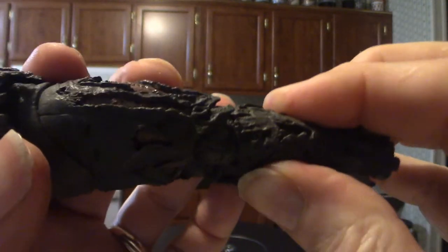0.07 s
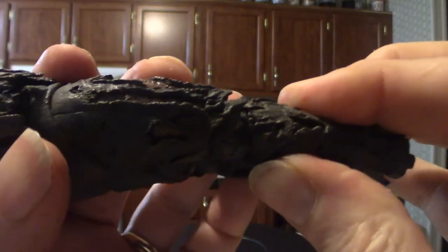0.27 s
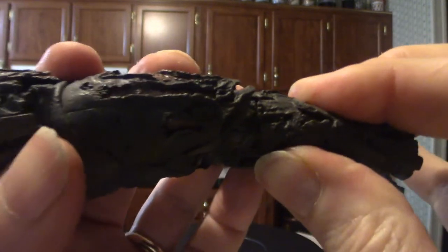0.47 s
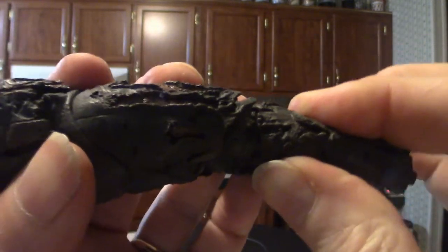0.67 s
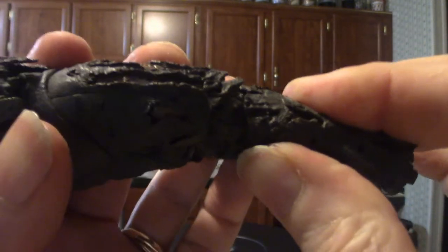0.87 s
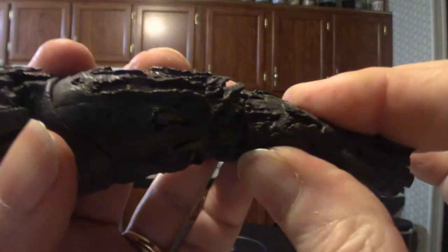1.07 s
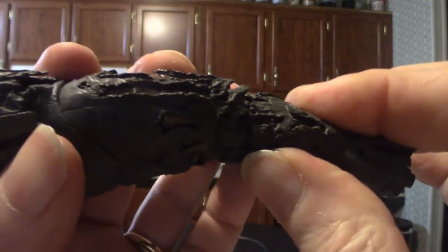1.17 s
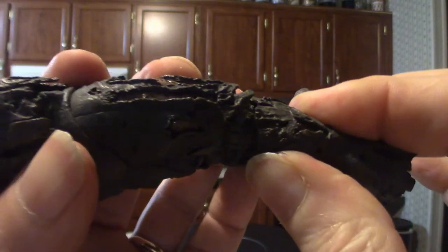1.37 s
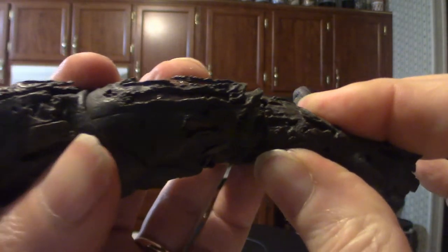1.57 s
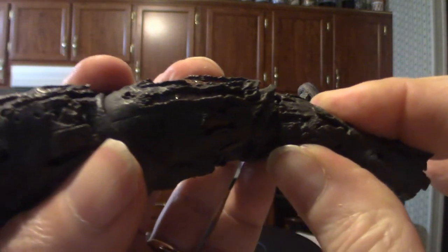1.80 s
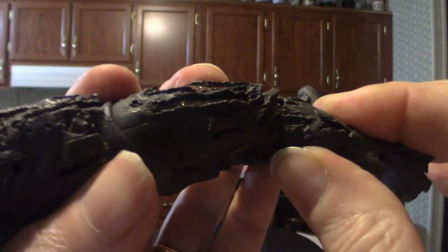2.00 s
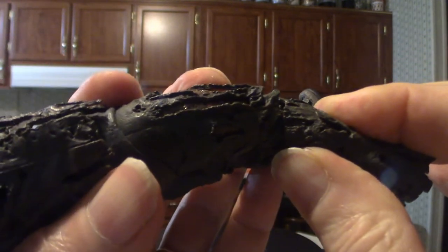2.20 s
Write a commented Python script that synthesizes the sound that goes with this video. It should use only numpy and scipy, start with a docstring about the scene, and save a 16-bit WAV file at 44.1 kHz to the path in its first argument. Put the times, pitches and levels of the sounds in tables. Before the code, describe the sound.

Sharp plastic ratchet clicks from a toy figure's joint, single at first, then a fast run.

```python
"""Toy figure's ratchet joint

In a kitchen, close to a stereo microphone, hands bend the stiff joint of a plastic toy figure.
It first scrapes in small slips, then snaps from tooth to tooth, singly and in a fast run.
Every snap rings the same short-lived plastic modes. The limb knocks dully three times,
the gripping fingers rumble, and the room answers over its own quiet tone."""
import sys
import numpy as np
from scipy import signal
from scipy.fft import rfft, irfft, next_fast_len
from scipy.io import wavfile
from scipy.ndimage import uniform_filter1d

SR = 44100
rng = np.random.default_rng(int(sys.argv[2]) if len(sys.argv) > 2 else 0)


def wrap_up_sound(samples):
    """Save the sound to the file named by the first command line argument, as 16-bit audio."""
    columns = np.atleast_2d(samples).T
    # keep every value between -1 and 1, then stretch to whole-number steps
    tamed = np.clip(columns, -1, 1)
    steps = np.round(tamed * 32767).astype(np.int16)
    wavfile.write(sys.argv[1], SR, steps)


N = 99048
TOP_HZ = 16600  # the microphone's band limit


def amp(db):
    """Decibels as a gain."""
    return 10 ** (np.asarray(db) / 20)


def unit(x):
    """x scaled to an RMS of one."""
    return x / np.sqrt(np.mean(x ** 2) + 1e-20)


def along(points, hz):
    """A curve through (Hz, value) points on a log frequency axis."""
    freqs, values = np.transpose(points)
    return np.interp(np.log(hz + 1), np.log(freqs + 1), values)


def swell(points):
    """Gain per sample from (seconds, dB) points, silent outside them."""
    s, db = np.transpose(points)
    return amp(np.interp(np.arange(N) / SR, s, db, left=-120, right=-120))


def filtered(x, response):
    """x through a filter given as a function of frequency."""
    n = x.shape[-1]
    size = next_fast_len(n + SR // 4)
    return irfft(rfft(x, size) * response(np.fft.rfftfreq(size, 1 / SR)), size)[..., :n]


def diffuse(colour, n):
    """Coloured noise that reaches the stereo microphone from all sides."""
    # Each row: frequency in Hz, correlation of left and right.
    likeness = [(30, 0.067), (100, 0.44), (500, 0.27), (2000, 0.78), (10000, 0.76)]
    angle = lambda hz: np.arccos(np.clip(along(likeness, hz), -1, 1)) / 2
    response = lambda hz: amp(along(colour, hz)) * [np.cos(angle(hz)), np.sin(angle(hz))]
    mid, side = filtered(rng.standard_normal((2, n)), response)
    return np.array([mid + side, mid - side])


def room_tone(level_db=-56):
    """The kitchen's steady, low hush all around the microphone."""
    # Each row: frequency in Hz, relative level in dB.
    colour = [(15, -43), (25, -12), (242, 3), (405, 2.5), (754, -1.5), (1100, -7), (7110, -17.5),
              (12200, -24), (16000, -29)]
    return amp(level_db) * unit(diffuse(colour, N))


def slips():
    """The tight joint sticks and lets go in small slips. The last row is not a slip: it is the sharp click that
    comes with the hard limb knock at 0.89 s."""
    # Each row: start in seconds, level in dB, extra near 8 kHz in dB, extra from 11 kHz up in dB.
    releases = [(.2632, -26.5, -24, -15), (.3035, -21, 5.5, 13), (.3160, -20, -27, -19),
                (.3752, -11, -9.5, -6), (.3986, -9.5, -5, -1), (.4116, -8.5, -7, -3), (.4185, -18, -17, -9),
                (.4260, -9.5, -13, -10), (.4322, -31, -16, -10), (.4372, -30, -16, -14),
                (.4440, -16.5, -8, -1), (.4535, -9, -8, -6.5), (.6150, -33, -9, 1), (.8900, -2, -13, -5)]
    # The force of a slip. Each row: frequency in Hz, level in dB.
    force = [(60, -8), (400, 2.5), (1000, -3), (2000, -4), (12000, -5), (15000, -13)]
    return clicks(releases, force)


def clicks(releases, force):
    """Each sudden release rings the joint a little differently and bounces off the hands."""
    # The joint's modes. Each row: frequency in Hz, width in Hz, level in dB.
    joint_modes = [(676, 410, -9), (1680, 330, -4.5), (1933, 590, 4.5), (2770, 420, 0.3), (3544, 113, 12.5),
                   (3966, 235, 10), (4824, 230, 6.5), (5664, 330, 15), (6417, 340, 10.5), (7020, 220, 3.5),
                   (7357, 160, 13), (7875, 207, 22.5), (8120, 150, 13.5), (8610, 227, 13), (9260, 310, 5.5),
                   (9920, 300, 9.5), (10500, 230, 5), (11170, 300, 5), (12120, 270, 12.5), (14100, 1700, 0)]
    # Echoes inside the limb and off the hands. Each row: delay in milliseconds, gain.
    echoes = [(0.441, 0.4), (0.947, 0.045), (1.658, -0.15)]
    # The ring rises as the joint bends. Each row: time in seconds, pitch shift as a fraction.
    bend = [(.9, -0.013), (1.1, -0.0061), (1.6, -0.0055), (2.1, -0.0028)]
    detune, vary_db = 0.0021, 0.8  # scatter of each mode from click to click
    rebound_s, rebound_gain = 0.002, 0.71  # a second, brighter contact follows each click
    smear_s = 0.00071  # spreads each click over this long, treble last, softening its spike
    hands = lambda hz: 1 + sum(gain * np.exp(-2j * np.pi * hz * ms / 1000) for ms, gain in echoes)
    smear = lambda hz: np.exp(-1j * np.pi * smear_s * hz * hz / TOP_HZ)
    out = np.zeros((2, N))
    for start_s, db, snap_db, top_db in releases:
        flight_s = rebound_s * rng.normal(1, .03)
        rebound = lambda hz: 1 + rebound_gain * (hz / TOP_HZ) ** 2 * np.exp(-2j * np.pi * hz * flight_s)
        scatter = rng.standard_normal((len(joint_modes), 2))
        modes = [(centre * (1 + detune * sharp), width, level + vary_db * loud)
                 for (centre, width, level), (sharp, loud) in zip(joint_modes, scatter)]
        stretch = 1 + np.interp(start_s, *np.transpose(bend))
        treble = [(5000, 0.022), (7500, snap_db), (9000, snap_db), (11000, top_db)]
        push = lambda hz: amp(db + along(force, hz) + along(treble, hz))
        body = lambda hz: resonances(modes, hz / stretch) * hands(hz / stretch) * rebound(hz) * smear(hz)
        add_hit(out, start_s, push, body)
    return out


def resonances(modes, hz):
    """Response of a body whose damped modes are given as (Hz, width in Hz, dB)."""
    return sum(amp(db) * 1j * hz * width / (centre ** 2 - hz ** 2 + 1j * hz * width)
               for centre, width, db in modes)


def add_hit(out, start_s, push, body, size=4096):
    """A push sounds through the plastic body close to the microphone and spills into the room."""
    # Left microphone port against right. Each row: frequency in Hz, level in dB, phase lead in radians.
    ports = np.array([(500, 0.5, -0.18), (2050, -0.5, 0.58), (4970, 0.9, 0.36), (5700, 1, -0.41),
                      (8200, -2.5, -0.38), (10300, -2.5, 0.69), (12700, 0.5, 0.83), (12900, -1, -0.94),
                      (15300, -1, -0.73)])
    # Scatter of that lead from hit to hit. Each row: frequency in Hz, spread in radians.
    sway = [(5000, 0.027), (9000, 0.33), (12000, 0.09)]
    hz = np.fft.rfftfreq(size, 1 / SR)
    preroll = size // 4
    spectrum = push(hz) * np.exp(-2j * np.pi * hz * preroll / SR)
    sound = room_answer(irfft(spectrum))
    left_db = along(ports[:, [0, 1]], hz)
    left_lead = along(ports[:, [0, 2]], hz) + rng.standard_normal() * along(sway, hz)
    half = np.array([[.5], [-.5]])  # split evenly between left and right
    stereo = amp(half * left_db) * np.exp(1j * half * left_lead)
    sound[:, :size] += irfft(spectrum * body(hz) * stereo)
    start = round(start_s * SR) - preroll
    out[:, start:start + sound.shape[1]] += sound[:, :N - start]


def room_answer(hit, delay_s=.003):
    """The kitchen's short reverberation; each frequency dies at its own speed."""
    # Spill into the room. Each row: frequency in Hz, level in dB.
    spill = [(150, -6), (700, -14.5), (1700, -8.5), (2650, 1), (3200, -6), (4000, -5.5), (8000, -1.5),
             (11000, -2), (14500, -5)]
    # Each row: frequency in Hz, seconds to fall by 60 dB.
    decay_times = [(800, 0.12), (2600, 0.26), (7000, 0.22), (15000, 0.15)]
    hz, t, noise = signal.stft(diffuse(spill, SR // 3), SR, nperseg=256)
    t60 = along(decay_times, hz)[:, None]
    equal_energy = np.sqrt(2 * np.log(1000) / (t60 * SR))
    fade = equal_energy * np.exp(-np.log(1000) * t / t60)
    tail = signal.istft(noise * fade, SR, nperseg=256)[1]
    delayed = np.pad(tail, ((0, 0), (int(delay_s * SR), 0)))
    return signal.fftconvolve(hit[None], delayed, axes=1)


def fingers():
    """The gripping fingers make a low rumble that swells and sinks."""
    # Each row: time in seconds, level in dB.
    levels = [(.3, -103), (.46, -58), (.55, -72), (1.35, -67.5), (1.5, -58.5), (1.63, -57), (1.72, -69.5),
              (1.89, -59.5), (2.05, -92)]
    # Each row: frequency in Hz, relative level in dB.
    colour = [(30, -86), (70, -35), (115, -18.5), (200, -25.5), (600, -71)]
    return swell(levels) * unit(diffuse(colour, N))


def scrape(grain_db=3):
    """Grainy friction of plastic on plastic between the slips."""
    # Each row: time in seconds, level in dB.
    levels = [(.36, -72), (.40, -55), (.425, -51), (.452, -51), (.475, -68)]
    # Each row: frequency in Hz, relative level in dB.
    colour = [(200, 3), (1000, 9), (3000, 0), (8000, -2), (15000, -20)]
    roughness = unit(uniform_filter1d(rng.standard_normal(N), size=60))
    return swell(levels) * unit(amp(grain_db * roughness) * diffuse(colour, N))


def knocks():
    """The limb knocks softly in its socket: only its low resonances sound, and a thump trails."""
    # Each row: start in seconds, level in dB, upper edge in Hz, bass in dB.
    contacts = [(0.4536, 1.5, 1630, -2.5), (0.8882, 16.5, 1400, -1), (2.217, 0, 2350, -7.5)]
    # The hand-held limb's modes. Each row: frequency in Hz, width in Hz, level in dB.
    limb_modes = [(131, 28, -4.5), (265, 97, -2), (470, 230, -5), (1104, 140, 1), (1460, 850, 7)]
    lag_s, thump_hz = 0.01058, 195  # the bass trails by up to this long, mostly below this pitch
    trail = lambda hz: np.exp(-2j * np.pi * lag_s * thump_hz * np.arctan(hz / thump_hz))
    body = lambda hz: resonances(limb_modes, hz) * trail(hz)
    lowpass = signal.butter(9, 1, analog=True)
    out = np.zeros((2, N))
    for start_s, db, edge_hz, bass_db in contacts:
        colour = [(50, -28), (130, bass_db), (450, bass_db), (1000, -6.5)]
        push = lambda hz: amp(db + along(colour, hz)) * signal.freqs(*lowpass, hz / edge_hz)[1]
        add_hit(out, start_s, push, body)
    return out


def teeth():
    """The ratchet snaps over from one tooth to the next."""
    # Each row: start in seconds, level in dB, extra near 8 kHz in dB, extra from 11 kHz up in dB.
    releases = [(0.7335, -4, -5.5, -4), (0.8085, -1.5, -6.5, -3.5), (0.845, -2, -4, -1.5),
                (0.8705, -1.2, -4.5, -3.5), (0.9278, 0, -5.5, -4), (1.0621, -2, -3, -1.8),
                (1.3063, -2, -2.5, -2.3), (1.4026, -1.7, -1.5, -1.5), (1.4534, -0.5, -3, -2),
                (1.4835, -1.5, -1.5, -1.5), (1.5104, -1.5, -1, -2.5), (1.5324, -2.5, -0.5, -2),
                (1.5507, -1.5, -1.5, -4), (1.5697, -3.5, 1.5, -1), (1.5879, -2.5, -2.5, -3),
                (1.6068, -3, 0.5, -2), (1.6295, -2.5, -0.5, -3), (1.656, -2.5, 0, -3.5),
                (1.6874, -2, 0.5, -3.5), (1.7229, -2, 0, -3), (1.7523, -2, 0, -2.5),
                (1.7786, -2.5, 0.3, -3), (1.801, -2, -1.5, -5), (1.8238, -2, -1.5, -5.5),
                (1.8492, -2, -2.5, -4.5), (1.8725, -3.5, 0, -4.5), (1.8954, -3, -2, -6.5),
                (1.9222, -3.5, -1, -6.5), (1.9627, -3, -3, -6.5), (2.0234, -3, -4, -7),
                (2.0779, -3.5, -3.5, -8), (2.1637, -4.5, -5, -9.5)]
    # The force of a snap. Each row: frequency in Hz, level in dB.
    force = [(70, -29), (350, 2.5), (10000, -1.5), (15000, -5.5)]
    return clicks(releases, force)


def scene():
    """Joint, fingers and limb up close, with the kitchen's room tone behind."""
    joint = teeth() + slips() + scrape()
    return joint + fingers() + knocks() + room_tone()


def record(dry):
    """The microphone's top rolls off, and nothing passes above its band limit."""
    # Each row: frequency in Hz, gain in dB.
    rolloff = [(14800, 0), (15400, -4), (16500, -13)]
    return filtered(dry, lambda hz: amp(along(rolloff, hz)) * (hz < TOP_HZ))


dry = scene()
out = record(dry)
wrap_up_sound(out)
```